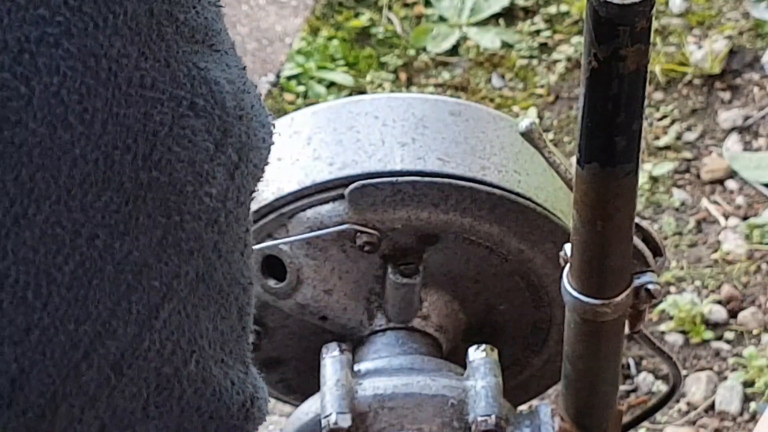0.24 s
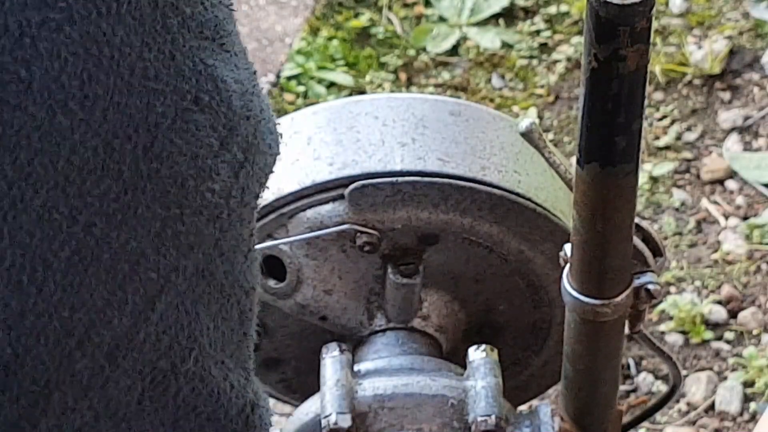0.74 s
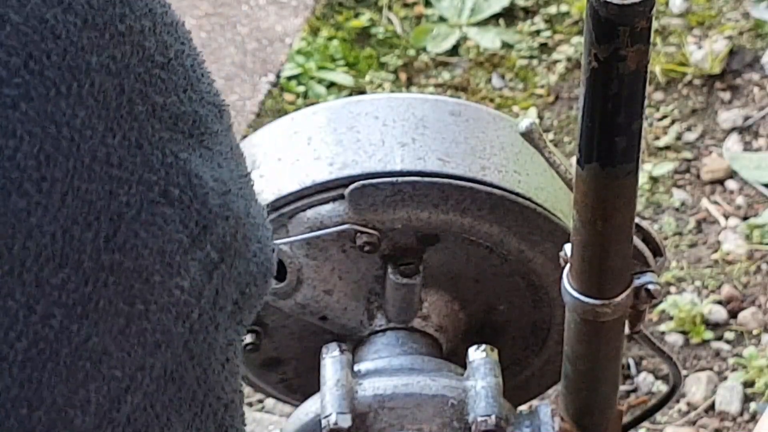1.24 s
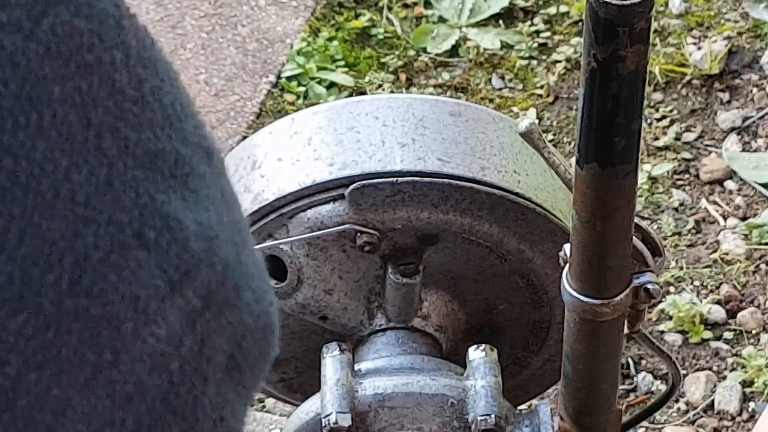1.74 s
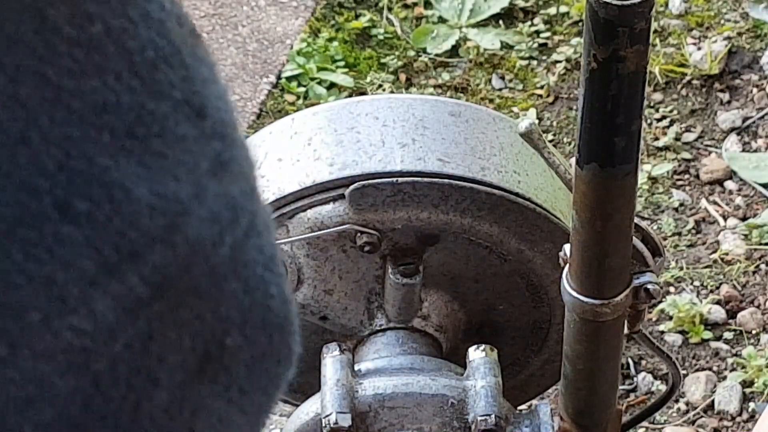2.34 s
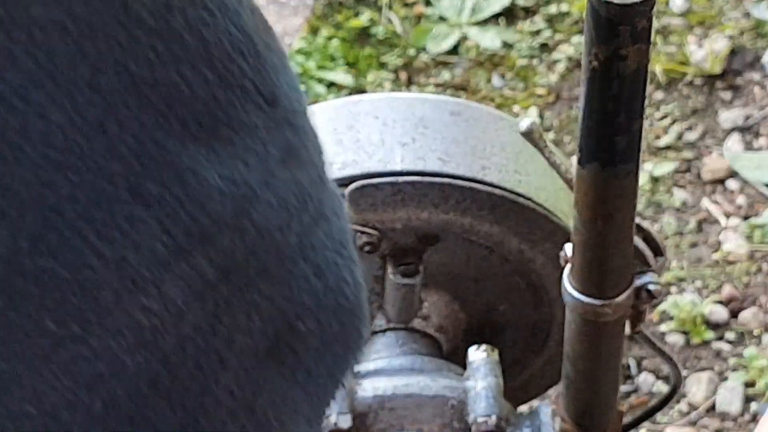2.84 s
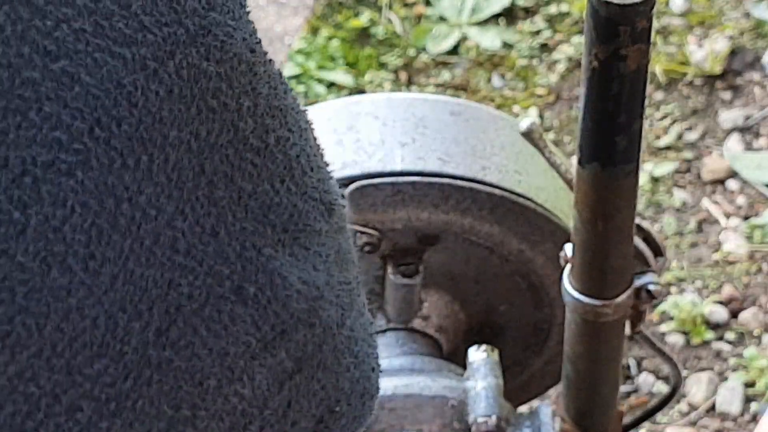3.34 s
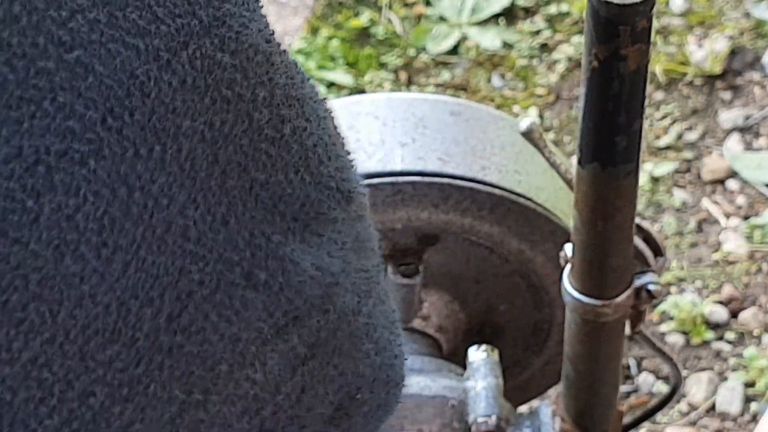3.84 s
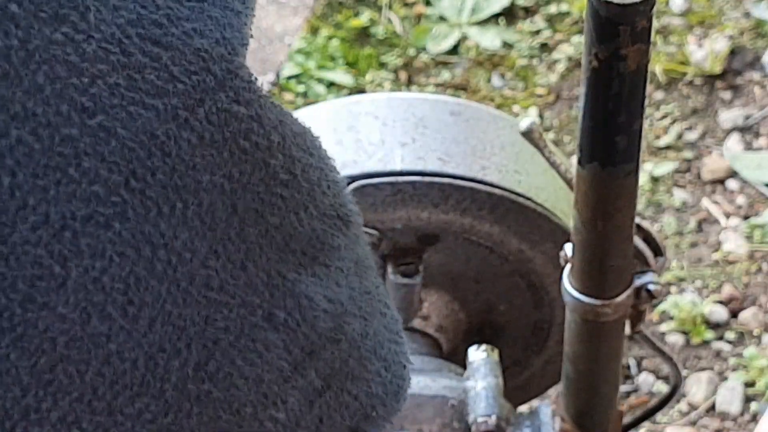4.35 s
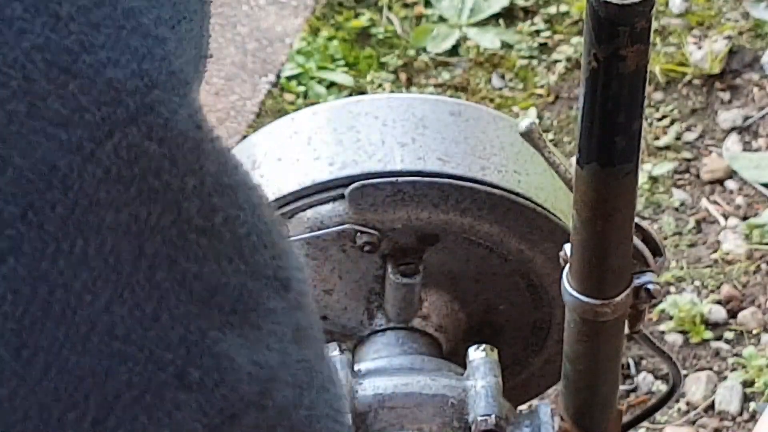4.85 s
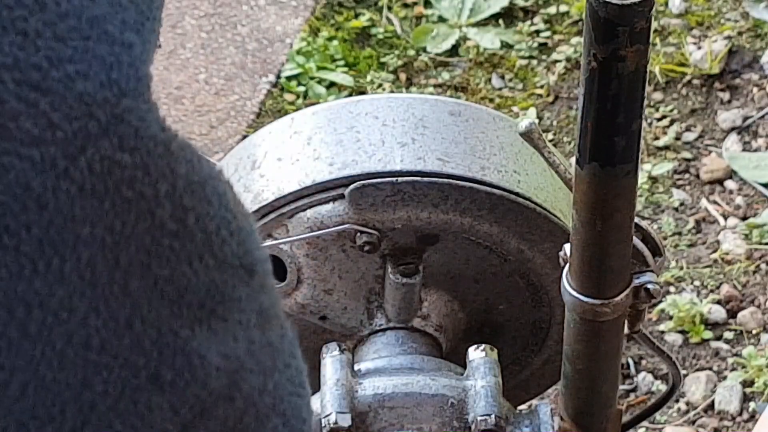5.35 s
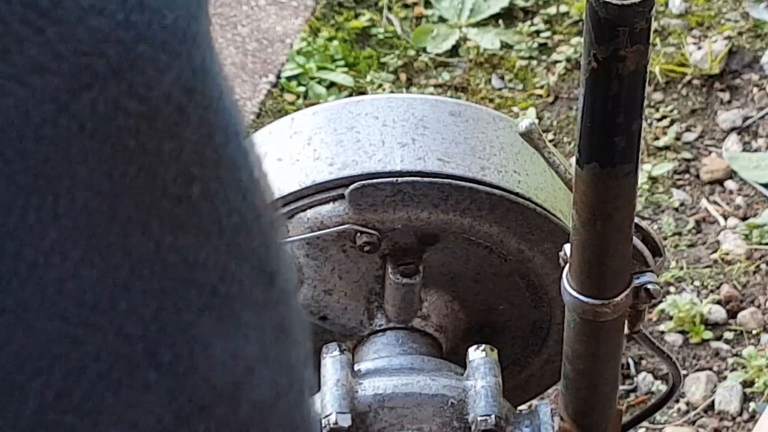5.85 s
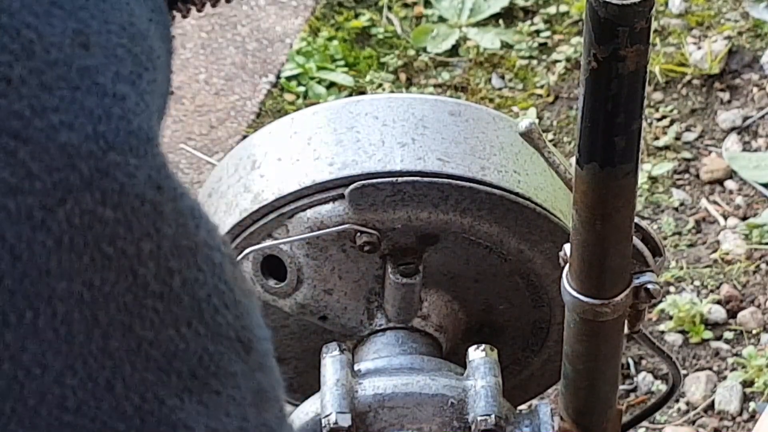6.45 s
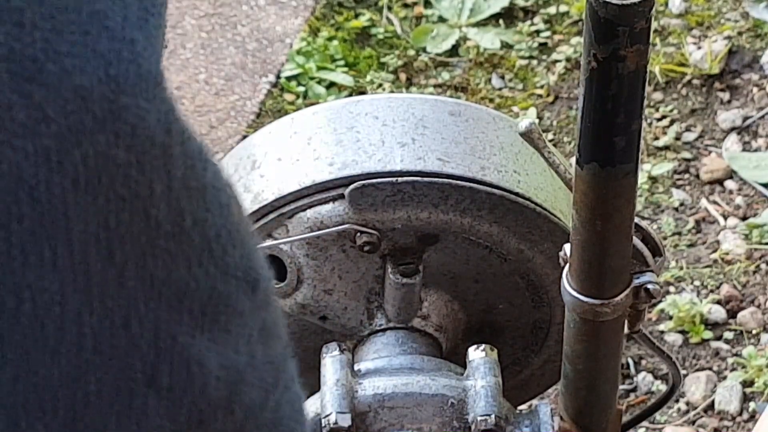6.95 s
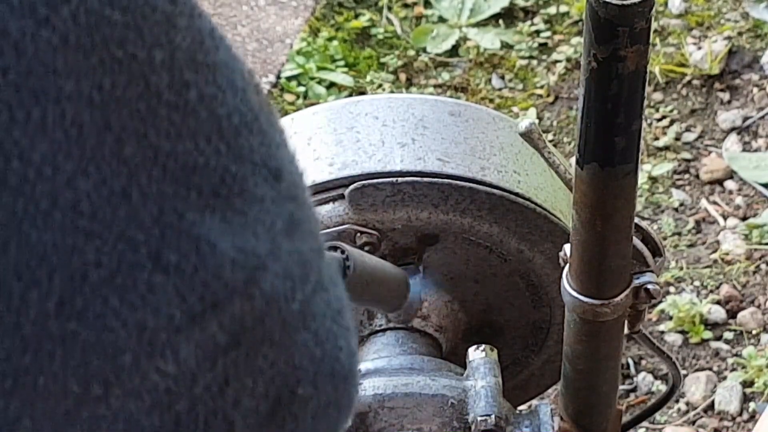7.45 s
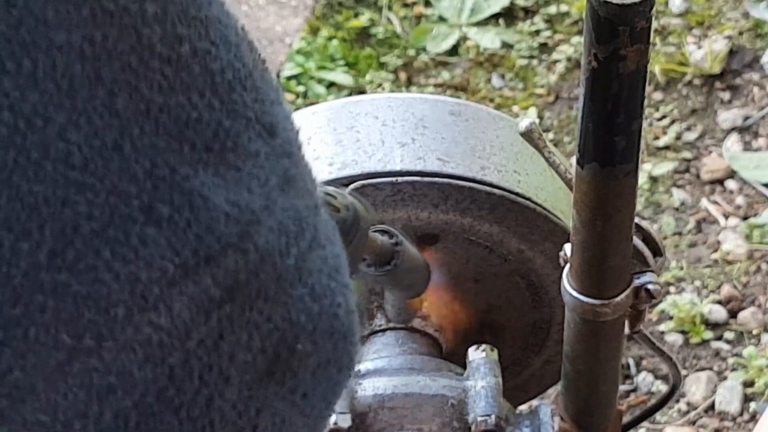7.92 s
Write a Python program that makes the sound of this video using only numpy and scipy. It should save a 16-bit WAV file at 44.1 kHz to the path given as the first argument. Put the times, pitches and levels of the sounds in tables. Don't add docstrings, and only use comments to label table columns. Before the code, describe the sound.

A quiet small yard with low distant traffic, nearer to the right. A dry double-edged igniter snap at 0.1 s, a tiny rattle, and another snap at 0.57 s; a gas torch catches at 0.6 s with a fluttering low roar and airy hiss. It sags at 1.2 s, surges around 1.5 s with another snap, weakens, puffs up at 2.3 s and goes out by 2.5 s. Unlit gas hisses with a faint whistle until 3.3 s. Cloth rustles; the can knocks hard at 3.37 s and again near 3.8 s, ringing thinly. From 4.2 to 4.9 s small metal rattles and a faint knob scrape. Snap at 5.43 s, flame catches at 5.63 s, falters, snap at 6.39 s, then grows to a loud steady roar by 7.2 s, hollower against the drum after 7.5 s, with brief dips until the end.

```python
import sys
import numpy as np
from scipy import signal
from scipy.fft import rfft, irfft, next_fast_len
from scipy.io import wavfile
from scipy.ndimage import uniform_filter1d

SR = 44100
rng = np.random.default_rng(int(sys.argv[2]) if len(sys.argv) > 2 else 0)


def inscribe(sig):
    pcm = np.round(np.clip(np.atleast_2d(sig).T, -1, 1) * 32767)
    wavfile.write(sys.argv[1], SR, pcm.astype(np.int16))


def voltage_ratio(decibels):
    exponent = np.asarray(decibels, float) / 20
    return 10 ** exponent


N = 360738
SIZE = next_fast_len(N + SR)
HZ = np.maximum(np.arange(SIZE // 2 + 1) * SR / SIZE, 1)
FAR_PORT_S = 0.000394
STEREO_SPREAD = 0.15


def rms_one(x):
    return x / np.sqrt(np.mean(x ** 2) + 1e-20)


def in_time(*tables):
    catch_s, die_s, silent_db = 0.016, 0.1, -110
    rows = []
    for table in tables:
        first, last = table[0], table[-1]
        rows.append([first[0] - catch_s, silent_db, *first[2:]])
        rows.extend(table)
        rows.append([last[0] + die_s, silent_db, *last[2:]])
    s, *columns = np.transpose(rows)
    return [np.interp(np.arange(N) / SR, s, column) for column in columns]


def swells(rows):
    t = np.arange(N) / SR
    return sum(height * np.cos(np.pi * np.clip((t - s) / length, -.5, .5)) ** 2 for s, length, height in rows)


def drift(rate):
    r = np.exp(-32 * np.pi * rate / SR)
    slow = signal.lfilter([1], [1, -2 * r, r * r], rng.standard_normal(N // 16 + 4002))[4000:]
    return np.interp(np.arange(N) / 16, np.arange(len(slow)), rms_one(slow))


def at_hz(points):
    hz, value = np.transpose(points)
    return np.interp(np.log(HZ), np.log(hz), value)


def filtered(x, response):
    return irfft(rfft(x, SIZE) * response, SIZE)[..., :N]


def delayed(s):
    return np.exp(-2j * np.pi * HZ * s)


def highpass(hz):
    return 1j * HZ / (hz + 1j * HZ)


def resonance(hz, width_hz):
    return 1j * HZ * width_hz / (hz ** 2 - HZ ** 2 + 1j * HZ * width_hz)


def ringing(hz, t60_s):
    return t60_s * resonance(hz, np.log(1000) / np.pi / t60_s)


def ring_filter(hz, width_hz):
    r = np.exp(-np.pi * width_hz / SR)
    return [(1 - r * r) / 2, 0, (r * r - 1) / 2], [1, -2 * r * np.cos(2 * np.pi * hz / SR), r * r]


def swelling(x, modes, swell_db, rate):
    out = 0
    for k, (hz, width, db) in enumerate(modes):
        top, bottom = ring_filter(hz, width)
        stage = top + bottom
        out = out + (-1) ** k * signal.sosfilt([stage, stage], x) * voltage_ratio(db + swell_db * drift(rate))
    return out


def moving(x, hz, width_hz):
    out, state = np.zeros_like(x), np.zeros((len(x), 2))
    for i in range(0, N, 256):
        top, bottom = ring_filter(hz[i], width_hz)
        out[:, i:i + 256], state = signal.lfilter(top, bottom, x[:, i:i + 256], zi=state)
    return out


# (frequency [Hz], likeness [-])
LIKENESS = [(25, -1), (60, .7), (150, .85), (380, 0.08), (950, 0.12), (2380, -0.5), (5980, -1.2),
            (15000, -2)]


def hiss(colour, lumps_db, lumps_rate, apart, lag_s=0):
    lumps = voltage_ratio(lumps_db * 2 * np.tanh(drift(lumps_rate) / 2))
    mid, side = rfft(rng.standard_normal((2, N)) * lumps, SIZE) * voltage_ratio(at_hz(colour))
    alike = np.clip(1 - apart * (1 - at_hz(LIKENESS)), 0, 1)
    mid, side = mid * np.sqrt(1 + alike), side * np.sqrt(1 - alike)
    return rms_one(irfft([(mid + side) * delayed(lag_s), mid - side], SIZE)[:, :N])


# (frequency [Hz], level [dB])
TRAFFIC_COLOUR = [(12, -27), (20, 0), (96, -5.5), (222, -9.5), (248, -7.5), (328, -4), (499, -5),
                  (759, -2.5), (897, -2), (2990, -21.5), (10200, -34.5), (13200, -30), (16000, -46)]


def traffic():
    rise_db, rise_s = 5, 4.9
    level_db = -59 + rise_db * (1 - np.exp(-np.arange(N) / SR / rise_s))
    return hiss(TRAFFIC_COLOUR, lumps_db=.8, lumps_rate=11, apart=0.6, lag_s=FAR_PORT_S) * voltage_ratio(level_db)


# (middle [s], length [s], peak level [dB])
SLEEVES = [
    (2.943, 0.78, -59.5),
    (3.605, 0.62, -61.5),
    (4.52, 1, -65),
]


def sleeves():
    cloth = [(800, -5), (2300, 9), (4500, 7.0), (6500, -4.0), (16000, -11)]   # (Hz, dB)
    rustle = swells([(s, length, voltage_ratio(db)) for s, length, db in SLEEVES])
    return hiss(cloth, lumps_db=2, lumps_rate=40, apart=.8) * rustle


# (delay [s], left level [dB], right level [dB])
ECHOES = [(.0030, -47, -12.5), (.0097, -0.5, -11), (0.0134, -49, -5)]


def yard():
    tail_t60_s, tail_db, onset_s = 0.18, 1.5, 0.0068
    age = np.arange(SR // 3) / SR
    tail = rng.standard_normal((3, len(age))) * voltage_ratio(-60 * age / tail_t60_s) * np.clip(age / onset_s, 0, 1)
    tail = rfft(tail / np.sqrt(np.sum(tail[0] ** 2)), SIZE)
    own = highpass(500)
    response = voltage_ratio(tail_db) * (own * tail[:2] + (1 - own) * tail[2])
    for s, *db in ECHOES:
        early = np.array([[0], [FAR_PORT_S]])
        response = response + voltage_ratio(np.array(db))[:, None] * delayed(s - early)
    return response


def nearby():
    spray_db, t60_s = -5, .03
    spray = rng.standard_normal((2, SR // 20)) * voltage_ratio(-60 * np.arange(SR // 20) / SR / t60_s)
    return voltage_ratio(spray_db) * rfft(spray / np.sqrt(np.sum(spray[0] ** 2)), SIZE)


# (frequency [Hz], width [Hz], left level [dB], right level [dB])
STANDING = [(128, 35, 3, 3), (228, 30, -4, -2), (318, 25, 4, 5), (426, 28, 2, 3), (545, 28, 3, 5),
            (634, 22, 4, 6), (726, 22, 2, 4), (805, 50, 4, 3), (913, 35, 4, 2), (995, 40, 5, 7),
            (1110, 45, 2, 3), (1312, 40, 0, 0), (1420, 50, -2, 2)]


def standing_waves():
    return sum(voltage_ratio(np.array(db))[:, None] * resonance(hz, width) for hz, width, *db in STANDING)


# (middle [s], length [s], peak level [dB])
KNOB = (4.4, 0.98, -63)


def knob():
    body_hz, body_width_hz = 1960, 520
    s, length, db = KNOB
    rub = rng.standard_normal(N) * voltage_ratio(7.9 * drift(32))
    return rms_one(filtered(rub, resonance(body_hz, body_width_hz) ** 2)) * swells([(s, length, voltage_ratio(db))])


# (time [s], peak level [dB], contact softness corner [Hz], ring level [dB])
KNOCKS = [(3.3703, -27, 1190, -30), (3.3711, -15, 1460, -9), (3.3735, -25, 1830, -30),
          (3.3752, -38, 1500, -30), (3.3798, -35, 1300, -33), (3.3843, -27, 800, -30),
          (3.3935, -26, 900, -30), (3.3995, -28, 800, -30), (3.787, -36, 4000, -9), (3.797, -69, 1200, -20),
          (3.802, -27, 700, 0), (3.811, -27, 600, -20), (4.324, -55, 6000, -7), (4.53, -56, 1500, -27)]
# (frequency [Hz], level [dB], t60 [s])
CAN = [(604, -8, 0.12), (880, -12, .08), (1450, -20, 0.08), (2290, -15, 0.2), (2410, -12, 0.2),
       (4500, -8, .1), (5254, -6, 0.4), (5900, -3, 0.33), (5935, -14, .2)]
# (frequency [Hz], width [Hz], level [dB])
CAN_THUD = [(516, 190, -3), (900, 570, -2), (1370, 490, 3.5), (2330, 520, 3.5), (4630, 2200, 2.5)]


def knocks():
    thud = sum(voltage_ratio(db) * resonance(hz, width) for hz, width, db in CAN_THUD) * highpass(280)
    ring = sum(voltage_ratio(db) * ringing(hz, t60) for hz, db, t60 in CAN)
    out = 0
    for k, (s, db, soft_hz, ring_db) in enumerate(KNOCKS):
        contact = (-1) ** k * voltage_ratio(db + 24.5) * delayed(s) / (1 + 1j * HZ / soft_hz) ** 2
        out = out + contact * (voltage_ratio(ring_db + 35.0) * ring + thud)
    return out


# (time [s], peak level [dB], frequency [Hz], t60 [s])
PINGS = [(3.371, -48, 5860, .3), (3.371, -54, 5890, .15), (4.3239, -45, 5340, .14), (3.787, -55, 5860, .4),
         (3.373, -42, 4650, .04), (3.384, -44, 4400, .06), (3.416, -43, 2400, .18), (3.8, -44, 420, .1),
         (3.806, -44, 5300, .08), (3.786, -46, 4500, .06), (4.447, -55, 1990, .05),
         (4.2656, -56, 2000, .04)]


def pings():
    return sum(voltage_ratio(db + 61.5) * delayed(s) * ringing(hz, t60) for s, db, hz, t60 in PINGS)


def chatter(events, density, loose_db=0):
    rub_s = .0165
    draws = rng.standard_normal((len(events), 2000)) * (rng.random((len(events), 2000)) < density)
    draws = draws * voltage_ratio(loose_db)
    draws[:, 0] = 1.28
    clicks = np.zeros((3, N))
    for (s, db, length, low_db, top_db), draw in zip(events, draws):
        floor_s = max(length, .001)
        age = np.arange(2000) / SR / floor_s
        if length > rub_s:
            shape = np.sin(np.pi * age) ** 2
        else:
            shape = np.minimum(1, age * 3 + 0.0045 / floor_s)
        burst = draw * (age < 1) * shape * voltage_ratio(db + 10.0)
        clicks[:, round(s * SR):][:, :2000] += burst * voltage_ratio(np.array([[low_db], [0], [top_db]]))
    return clicks


# (time [s], peak level [dB], chatter [s], low mode [dB], top modes [dB])
RATTLES = [(.352, -60.5, 0.0042, 11, 5), (3.3705, -47.5, 0.01, -6, 5.5), (3.7815, -41, 0.015, 5, 1),
           (3.79, -48, 0.026, 8, -9), (4.177, -42.5, 0.0023, 3, 4), (4.227, -60, 0.037, 3, 9),
           (4.248, -51, 0.043, 3, 3), (4.32, -52.5, 0.014, 0, 6), (4.3255, -48, .001, -3, 6),
           (4.36, -60, 0.025, -1, 7), (4.43, -46.5, 0.031, -3, 3), (4.527, -63, 0.014, 5, -2),
           (4.662, -49, 0.019, 0, 2), (4.863, -70, 0.0052, 2, 4), (5.629, -45, 0.0091, 4, -25),
           (4.2656, -48, 0.0009, 1, -5), (4.4472, -53, 0.0009, 3, 4), (4.456, -50, 0.00092, 2, -2),
           (4.19, -55, 0.00088, 6, 7)]


def rattles():
    return chatter(RATTLES, density=0.25)


# (time [s], peak level [dB], low mode [dB], top modes [dB])
SNAPS = [
    (0.1224, -28.5, 1.5, -2),
    (0.5696, -28.5, 1, -1.5),
    (1.518, -30.5, -3, -0.5),
    (5.4345, -26.5, 2.5, -2),
    (6.3856, -25, -6, -4),
]


def snaps():
    chatter_s, rebound_s, rebound_db = .004, .0027, -1
    strikes = []
    for s, db, *modes_db in SNAPS:
        for k in (0, 1):
            strikes.append((s + k * rebound_s, db + 7.5 + k * rebound_db, chatter_s / (1 + k), *modes_db))
    return chatter(strikes, density=0.28, loose_db=-7)


# (frequency [Hz], width [Hz], level [dB])
HOUSING = [(2000, 640, 0), (3120, 790, -3), (4150, 1700, -16), (5630, 1560, 2), (11350, 3300, -7.5),
           (14700, 2000, -9)]
# (frequency [Hz], width [Hz], level [dB])
SPRING = (5550, 20, 3)


def igniter():
    low, middle, top = rfft(snaps() + rattles(), SIZE)
    modes = [voltage_ratio(db) * resonance(hz, width) ** 2 for hz, width, db in HOUSING]
    hz, width, db = SPRING
    spring = voltage_ratio(db) * resonance(hz, width)
    crack = voltage_ratio(-13) * resonance(2500, 9300) ** 2
    return low * (modes[0] - modes[1]) + middle * (modes[2] - modes[3] + spring + crack) + top * (modes[5] - modes[4])


# (time [s], level [dB], whistle [Hz])
LEAK = [
    (2.44, -54, 2680),
    (2.6, -54.5, 2650),
    (2.8, -51, 2620),
    (3.08, -54.5, 2570),
    (3.23, -59, 2650),
    (3.33, -89, 2700),
]
# (frequency [Hz], level [dB])
LEAK_COLOUR = [(940, -13), (1600, -16), (2150, -14), (2410, -4.5), (2620, -8), (2940, -9), (3660, -23),
               (4690, -22.5), (5950, -14), (7190, -22), (8300, -29), (12400, -5.5), (13700, -16.5),
               (15600, -16.5)]
# (frequency [Hz], width [Hz], level [dB])
LEAK_MODES = [(6000, 810, 0.5), (11500, 750, -15), (12500, 900, -12)]


def leak():
    width_hz, waver_hz = 280, 15
    level_db, whistle_hz = in_time(LEAK)
    whistle_hz = whistle_hz + waver_hz * drift(7.9)
    gas = hiss(LEAK_COLOUR, lumps_db=0.7, lumps_rate=41, apart=2 * STEREO_SPREAD)
    whistle = moving(moving(gas, whistle_hz, width_hz), whistle_hz, width_hz)
    whistle = whistle * voltage_ratio(8.5 + 2.0 * drift(22))
    gas = 1.45 * gas + whistle + swelling(gas, LEAK_MODES, swell_db=2.5, rate=17)
    return rms_one(gas) * voltage_ratio(level_db + 2.0)


# (frequency [Hz], level [dB])
JET_COLOUR = [(2820, -28), (4800, -3), (5840, -4), (7200, -6.5), (7810, -7), (8750, -6.5), (9940, -8),
              (12500, -9.5), (14600, -4.5), (15600, -1.5)]
# (frequency [Hz], width [Hz], level [dB])
JET_MODES = [(6000, 500, -10), (8400, 200, 1), (14700, 900, -10)]


def nozzle_jet(size_db, turn_db, flutter):
    follows, turn_share = 0.98, 1.63
    level_db = size_db - (1 - follows) * (np.maximum(size_db, -55) + 35.5) - 17 + turn_share * turn_db
    jet = hiss(JET_COLOUR, lumps_db=1.2, lumps_rate=150, apart=2 * STEREO_SPREAD)
    jet = jet * voltage_ratio(level_db + .7 * flutter)
    return jet + swelling(jet, JET_MODES, swell_db=6.0, rate=4.8)


# (frequency [Hz], level [dB])
TUBE_COLOUR = [(700, -31), (1100, 3.5), (1300, -3), (1600, -6), (2000, -3), (2600, -2), (3200, -5.5),
               (3800, -12), (4450, -12.5), (4700, -17.5), (6500, -24.5), (8500, -55)]
# (frequency [Hz], width [Hz], level [dB])
TUBE_MODES = [(1520, 860, -2.5), (1937, 74, 6), (3100, 64, -32), (4360, 200, 7)]
# (frequency [Hz], width [Hz], level [dB])
DRUM_HOLLOW = [(1100, 390, 2), (1640, 190, 11.5), (2210, 220, -10)]


def burner_tube(gap_hz):
    gap_width_hz, on_drum_s, reach_s = 300, 7.56, 0.09
    gas = hiss(TUBE_COLOUR, lumps_db=2.6, lumps_rate=250, apart=STEREO_SPREAD)
    gap = voltage_ratio(7.5 - 2 * drift(1.0)) * moving(gas, gap_hz, gap_width_hz)
    tube = rms_one(gas + gap + swelling(gas, TUBE_MODES, swell_db=1.8, rate=4.9))
    reach = np.clip((np.arange(N) / SR - on_drum_s) / reach_s + .5, 0, 1)
    return tube + reach * swelling(gas, DRUM_HOLLOW, swell_db=.5, rate=6.1)


# (from [s], left delay [ms], right delay [ms], reflected share [-])
POSES = [
    (0, 1.5, 1.55, .3),
    (1.45, 2.85, 2.55, .25),
    (2.2, 3.0, 3.0, .3),
    (4, 2.0, 1.58, .45),
    (7.28, 1.3, 1.33, .25),
]


def off_drum(x):
    move_s, sway_ms = .1, .03
    s, *pose = np.transpose(POSES)
    now = np.arange(N)
    held = np.array(pose)[:, np.searchsorted(s * SR, now, "right") - 1]
    *delay_ms, share = uniform_filter1d(held, size=int(move_s * SR))
    lag = (delay_ms + sway_ms * drift(2)) * SR / 1000
    return x + share * np.array([np.interp(now - late, now, side) for late, side in zip(lag, x)])


# (frequency [Hz], level [dB])
ROAR_COLOUR = [(25, -64), (50, -13), (80, -15), (123, -13.5), (200, -13.5), (316, -6.5), (495, -2.5),
               (700, 1.5), (1000, -2.5), (1250, -9), (1600, -7), (2100, -36.5)]
# (time [s], roar loss [dB], length [s])
GUTTERS = [
    (6.586, -3, 0.031),
    (6.666, 6, 0.046),
    (7.241, 6, 0.052),
    (7.8, 9, 0.02),
    (7.882, 4, 0.092),
    (8.056, 3, 0.11),
]


def roar(size_db, flutter):
    level_db = size_db - swells([(s, length, db) for s, db, length in GUTTERS])
    rumble_db = 8 - 0.39 * (np.maximum(size_db, -42) + 40.5)
    bursts = hiss(ROAR_COLOUR, lumps_db=1.3, lumps_rate=90, apart=STEREO_SPREAD)
    bursts = bursts * voltage_ratio(level_db + 1.2 * flutter)
    bass = signal.sosfilt(signal.butter(2, 380, fs=SR, output="sos"), bursts)
    return bursts + (voltage_ratio(rumble_db) - 1) * bass


# (time [s], flame size as roar level [dB], nozzle turn to the microphones [dB], gap resonance [Hz])
BURNS = [
    [(0.61, -44, 0.5, 4200), (0.8, -41.5, 0, 3900), (1.15, -41.5, 0, 3920), (1.23, -46.5, -0.5, 3950),
     (1.51, -37, 1, 3770), (1.88, -39, 1.5, 3900), (2.23, -44.5, 0, 3950), (2.33, -35, 2, 3698),
     (2.43, -40.5, 4, 3700)],
    [(5.635, -42.5, 4, 3900), (5.69, -39.5, 0, 3950), (5.87, -51, 1.5, 3850), (6.0, -45, 0.5, 3797),
     (6.15, -48.5, 1.5, 3950), (6.24, -38.5, 1, 3850), (6.7, -32, 2.5, 3746), (7.2, -28.5, 0.5, 3992),
     (8.18, -30, 4, 3748)],
]
# (middle [s], length [s], turn [dB], gap resonance shift [Hz])
SWINGS = [
    (6.883, .03, 2, 0),
    (7.01, 0.57, 2, 73),
    (7.427, 0.6, 1.5, -300),
    (7.52, 0.04, 3.5, 0),
    (7.807, 0.11, 1, 146),
    (8.06, 0.16, -1.5, -100),
]


def flame():
    size_db, turn_db, gap_hz = in_time(*BURNS)
    turn_db = turn_db + swells([(s, length, db) for s, length, db, _ in SWINGS])
    gap_hz = gap_hz + swells([(s, length, hz) for s, length, _, hz in SWINGS])
    flutter = 2 * np.tanh(drift(31) / 2)
    low = filtered(roar(size_db, flutter), 0.33 + standing_waves())
    tube = burner_tube(gap_hz) * voltage_ratio(size_db - 4 + turn_db + .6 * flutter)
    return voltage_ratio(-0.5) * low + voltage_ratio(-1.48) * off_drum(tube) + nozzle_jet(size_db, turn_db, flutter)


def scene():
    pan_db, body_path_db, hit_wall_share, gas_wall_share = -7.5, -1, .55, .45
    walls = yard()
    treble = highpass(1100) ** 2
    bent = voltage_ratio(body_path_db) * delayed(FAR_PORT_S) * resonance(1350, 800)
    ports = np.array([(1 + bent) * voltage_ratio(pan_db * np.abs(treble)), 1 + 0 * bent])
    hits = irfft((igniter() + knocks() + pings()) * (ports + hit_wall_share * walls), SIZE)[:, :N]
    gas = flame() + leak() + knob()
    gas = filtered(gas, ports + treble * (gas_wall_share * walls + nearby()))
    return traffic() + sleeves() + hits + gas


def top_cut(x):
    return signal.sosfilt(signal.butter(12, 17010, fs=SR, output="sos"), x)


def record(dry):
    lowpass = signal.ellip(12, .5, 60, 15670, fs=SR, output="sos")
    mix = signal.sosfilt(lowpass, dry) - .0005
    return top_cut(mix)


dry = scene()
out = record(dry)
inscribe(out)
```